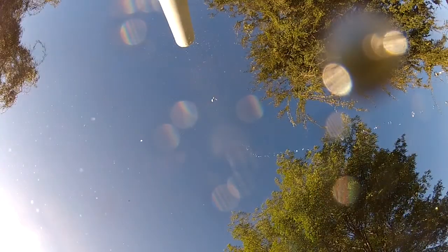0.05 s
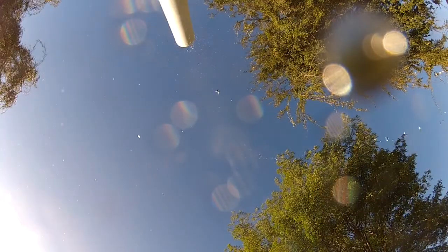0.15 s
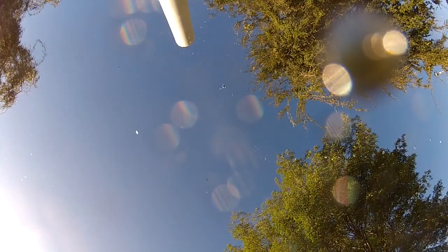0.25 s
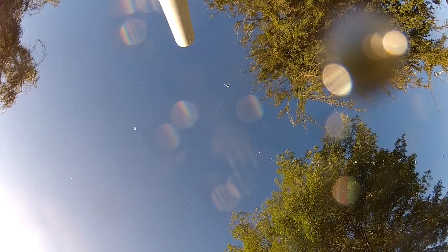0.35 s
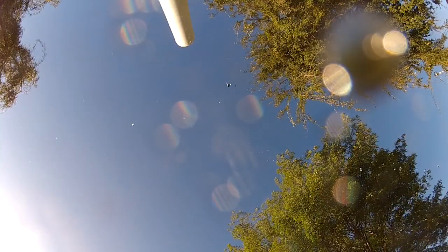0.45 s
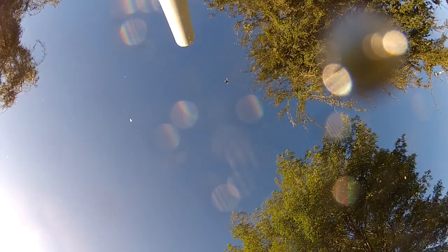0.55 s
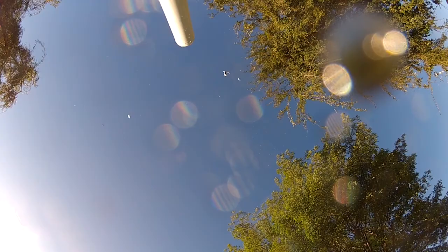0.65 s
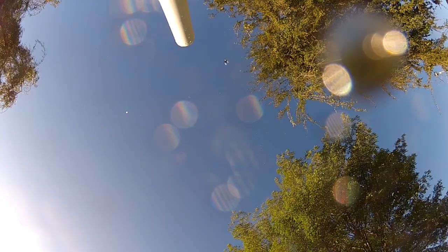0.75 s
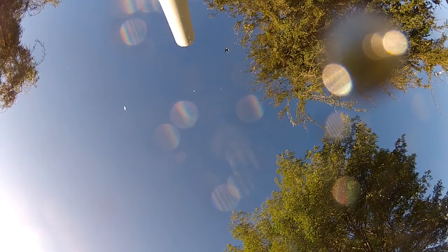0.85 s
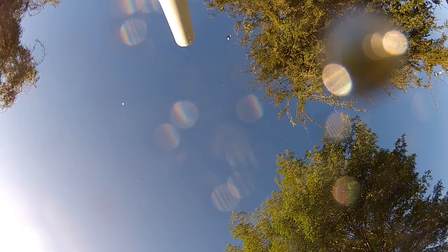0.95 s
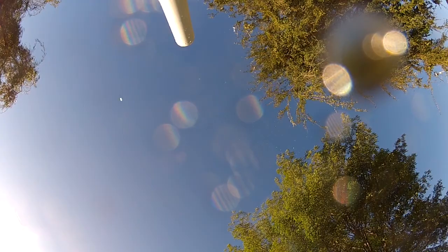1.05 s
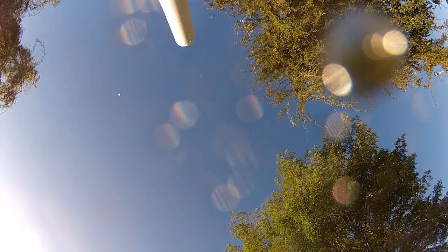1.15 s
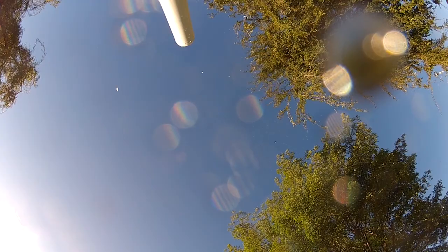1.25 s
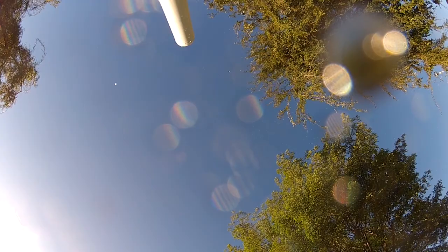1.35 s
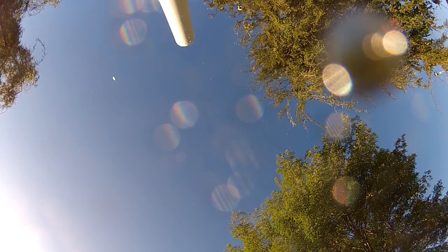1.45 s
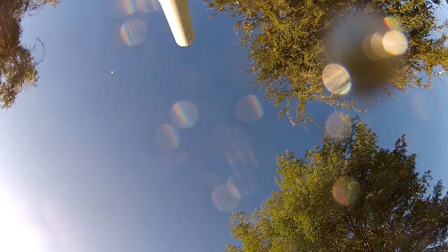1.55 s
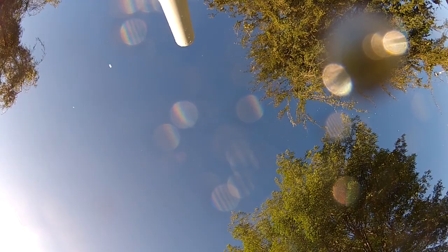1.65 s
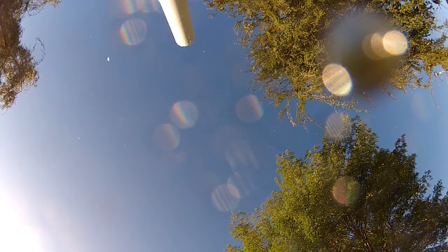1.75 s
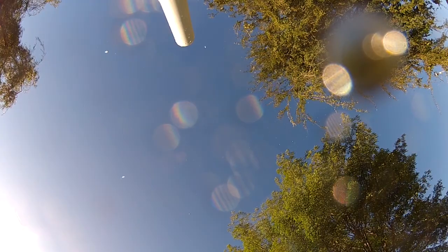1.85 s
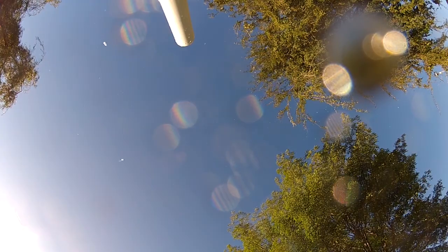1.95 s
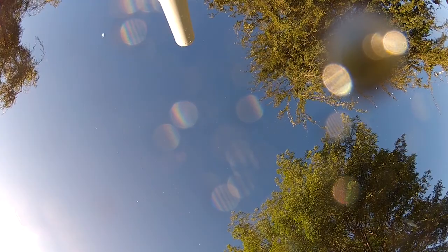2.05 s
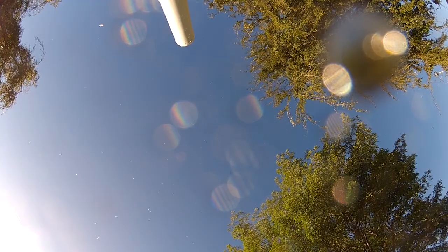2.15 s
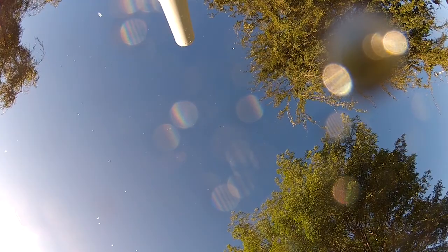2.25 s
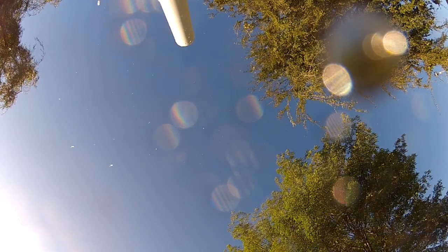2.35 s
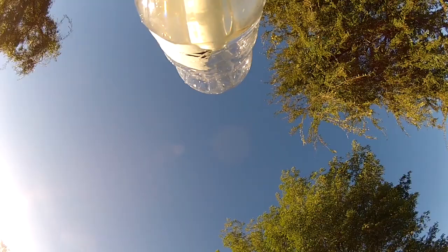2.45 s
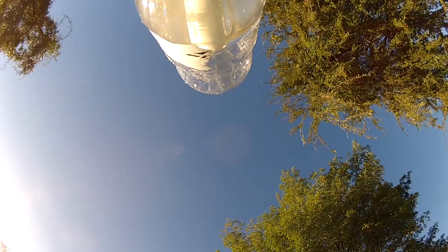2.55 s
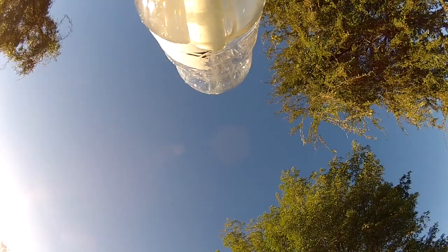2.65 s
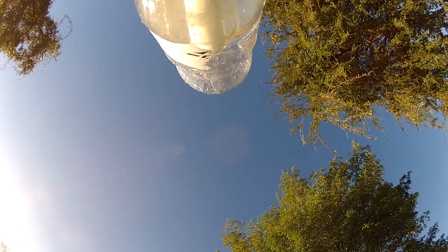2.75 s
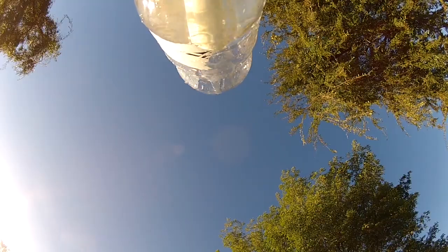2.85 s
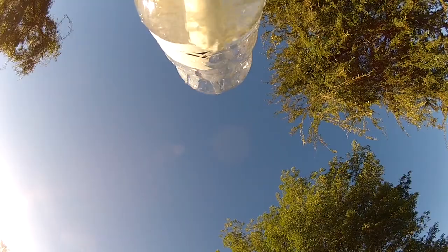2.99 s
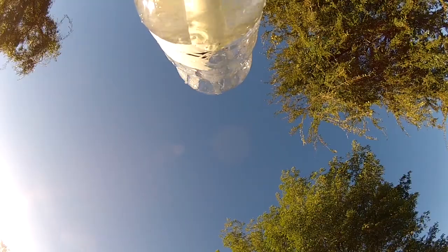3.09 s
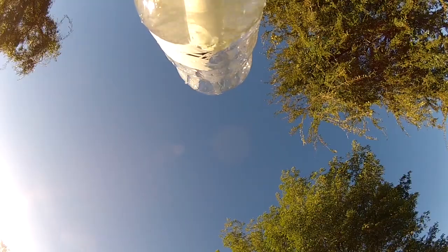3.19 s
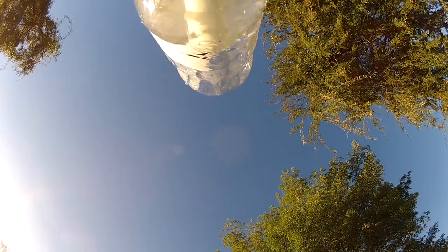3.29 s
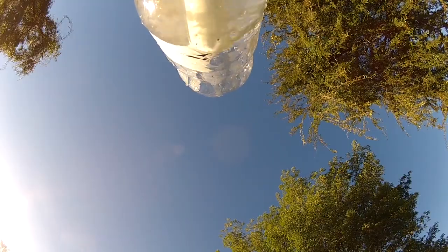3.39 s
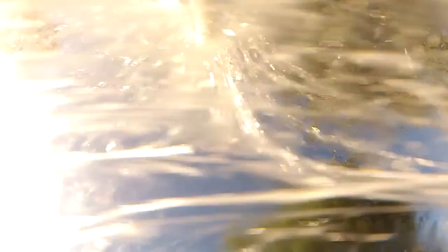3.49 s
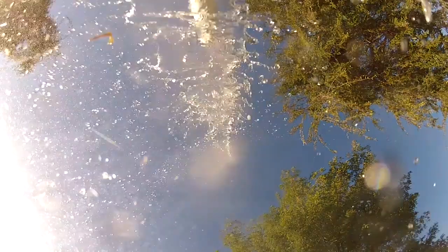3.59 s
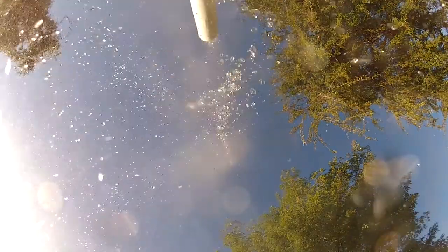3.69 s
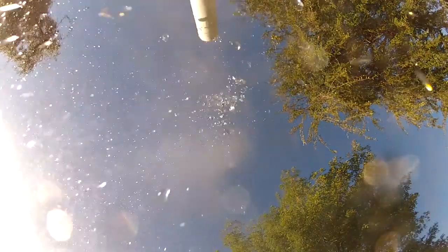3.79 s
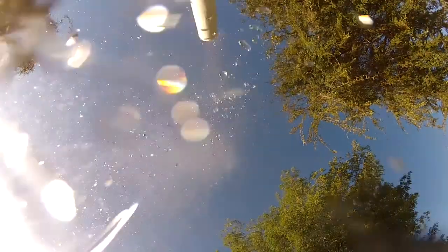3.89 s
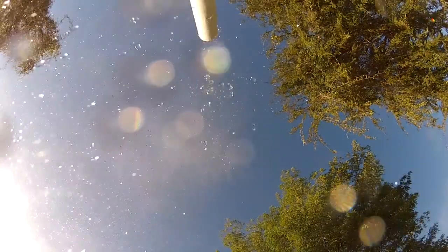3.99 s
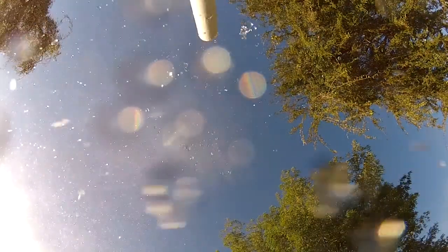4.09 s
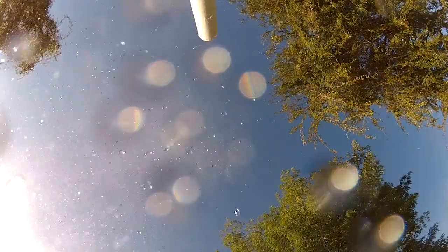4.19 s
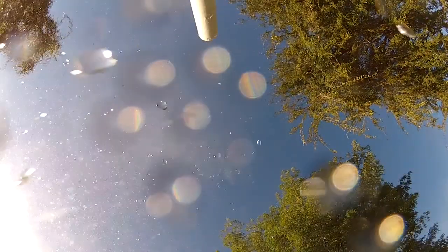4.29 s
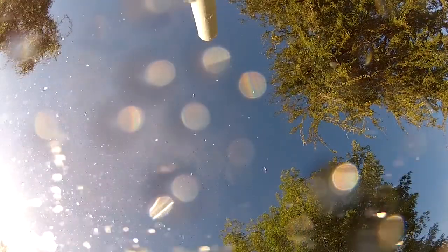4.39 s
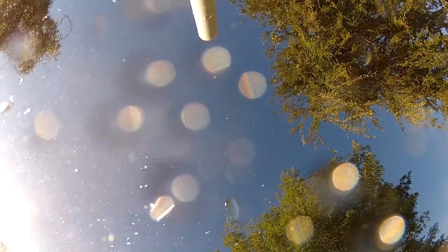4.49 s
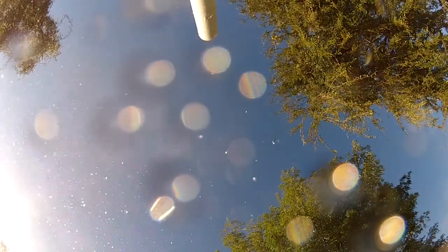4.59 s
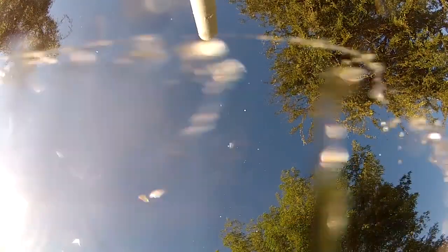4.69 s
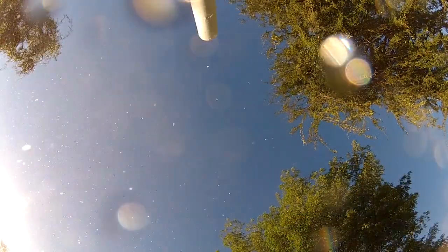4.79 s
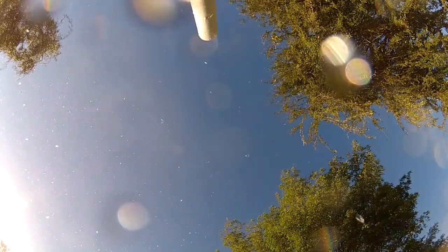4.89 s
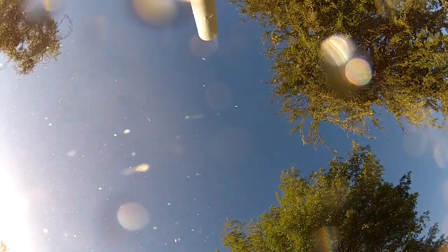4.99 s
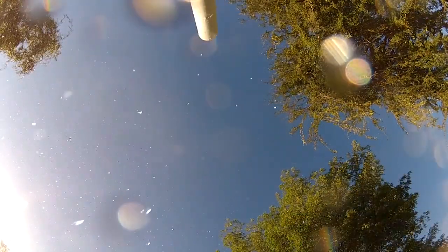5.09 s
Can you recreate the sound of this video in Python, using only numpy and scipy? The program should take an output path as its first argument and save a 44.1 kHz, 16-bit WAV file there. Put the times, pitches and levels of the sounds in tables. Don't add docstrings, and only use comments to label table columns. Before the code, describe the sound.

Dense bright spray rattles on a plastic camera housing, stops within half a second, and leaves sparse tiny drips in quiet open air. A faint wavering hiss and whistle comes from a bottle neck, then a loud crackling jet of water slaps the housing. Spray showers back and fat drops smack the plastic with short hard knocks. Close microphone inside the housing, gritty slowed playback.

```python
import sys
import numpy as np
from scipy import signal
from scipy.fft import rfft, irfft
from scipy.io import wavfile
from scipy.ndimage import uniform_filter1d

SR = 44100
rng = np.random.default_rng(int(sys.argv[2]) if len(sys.argv) > 2 else 0)


def generate_wav(sig):
    pcm = np.round(np.clip(np.atleast_2d(sig).T, -1, 1) * 32767).astype(np.int16)
    wavfile.write(sys.argv[1], SR, pcm)


def gain_from_db(level_db):
    decades = np.asarray(level_db, float) / 20
    return 10 ** decades


N = 226409

# time_s, level_db
SPRAY_VIGOUR = [
    [(0.0, -24), (0.114, -23), (0.2, -23.5), (0.284, -23.5), (0.352, -25), (0.39, -30), (0.45, -36),
     (0.52, -39), (0.558, -47), (0.66, -77)],
    [(3.585, -58), (3.643, -45.5), (3.687, -37), (3.791, -25.5), (3.893, -27.5), (3.951, -25.5),
     (4.103, -28.5), (4.151, -33.5), (4.335, -57)],
]
# pitch_hz, width_hz, level_db
SPRAY_BRIGHT_EARLY = [(3770, 190, -3), (4430, 300, -5.5), (5020, 220, -8.5), (5400, 200, -20),
                      (5900, 900, -25)]
SPRAY_BRIGHT_LATE = [(3820, 220, -5), (4426, 130, 0.5), (4940, 200, -8), (5350, 260, -10),
                     (4500, 2100, -13.5), (5900, 800, -22)]
# pitch_hz, width_hz, level_db
SPRAY_CENTRE_EARLY = [(736, 240, -26.5), (1100, 700, -2), (1400, 200, -6), (1710, 150, -10),
                      (2020, 150, -1), (2300, 200, 4), (2530, 200, 3)]
SPRAY_CENTRE_LATE = [(980, 325, -2), (1364, 95, -5), (1920, 970, -7), (2580, 110, 2.5)]
# level_db at full spray, share of the vigour followed, sag_db_per_s
SPRAY_MIDDLE_PART = [(-31, 0.74, 9.5), (-31, 0.9, 2)]
SPRAY_LOW_PART = [(-43, .4, 30), (-36, 1.2, 1.4)]
# pitch_hz at first, climb_share, width_hz, level_db,
# others_db (level of the other modes)
TUBE_MODE = [(3070, .06, 320, -5, -3), (3036, 0.044, 326, -4.5, -4.5)]
# pitch_hz, level_db
AIR_COLOUR = [(35, -47.5), (60, -1.5), (134, 2.5), (250, -1.5), (410, -2), (560, -10), (4960, -22),
              (5900, -31), (7670, -75.5)]
# start_s, rumble_db, drain_db_per_s
PORT_SOAKINGS = [
    (2.58, -57, 31.5),
    (3.62, -45, 22),
    (4.36, -38, 26),
]
# start_s, peak_db, pitch_hz, tick_db
NEAR_DRIPS = [(0.6642, -47, 3500, -77), (0.6853, -39.5, 2100, -77), (0.712, -60, 2400, -57),
              (0.7301, -52, 860, -63), (0.812, -53, 2420, -57), (0.9626, -47, 3080, -51.5),
              (1.0075, -48, 2270, -52), (1.0475, -33.5, 2470, -60), (1.1754, -60, 2350, -54),
              (1.3548, -40.5, 2500, -45.5), (1.3806, -48, 940, -58), (1.415, -47, 2220, -53),
              (1.5916, -45.5, 3120, -57.5), (1.632, -49.5, 3430, -59.5), (1.7162, -49, 1270, -63),
              (1.7588, -44.5, 3500, -74.5), (1.7866, -51, 960, -79), (1.8975, -60, 1960, -59),
              (2.0187, -42.5, 2420, -51), (2.0466, -49, 1080, -56), (2.068, -46, 2190, -60),
              (2.1015, -50, 1450, -75), (2.154, -48, 900, -84), (2.1788, -45, 1146, -70.5),
              (2.3392, -53, 2640, -65), (2.3669, -45, 1040, -60), (2.4077, -50, 3500, -62),
              (2.4228, -32.5, 934, -58), (2.4542, -50.5, 1060, -78), (2.4921, -56, 2240, -77)]
# start_s, peak_db, pitch_hz, tick_db
SECOND_DRIPS = [(4.515, -46, 2300, -58), (4.634, -39, 3500, -52), (4.657, -48, 953, -59),
                (4.688, -42, 3450, -62), (4.703, -52, 3600, -57), (4.769, -48, 2150, -58),
                (4.78, -48, 1017, -68), (4.798, -51, 2160, -60), (4.815, -44.5, 920, -53.5),
                (4.83, -44, 1000, -60.5), (4.889, -56, 3100, -66), (4.911, -52, 3400, -71),
                (4.934, -52, 1000, -54.5), (4.977, -55, 3300, -62), (5.07, -46, 1000, -72),
                (4.966, -44, 960, -70), (4.431, -50, 2200, -58), (5.016, -46, 1900, -58),
                (4.8185, -52, 2600, -62), (4.556, -39.5, 2540, -69), (4.9665, -37, 2330, -64),
                (5.091, -38.5, 910, -74), (5.115, -46, 966, -58)]
# start_s, peak_db, pitch_hz,
# tick_db
FURTHER_DRIPS = [(.666, -54, 1030, -80), (.69, -47, 1055, -82), (.7925, -61, 2240, -68),
                 (.8454, -67, 1890, -71), (.858, -67, 1900, -75), (.8828, -63, 2300, -64),
                 (.9107, -60, 2190, -67), (.9302, -58, 2100, -74), (.938, -57, 1950, -70),
                 (1.0804, -66, 3300, -64), (1.1492, -58, 2150, -78), (1.16, -62, 3400, -72),
                 (1.183, -60, 2260, -81), (1.2969, -55, 3450, -71), (1.3263, -64, 2270, -70),
                 (1.343, -54, 2300, -65), (1.343, -51, 960, -80), (1.384, -55, 1900, -80),
                 (1.43, -54, 2200, -62), (1.066, -66, 2300, -68), (1.366, -62, 2300, -68),
                 (1.502, -66, 2200, -68), (1.833, -66, 2000, -70), (1.918, -64, 2200, -67),
                 (1.936, -66, 3300, -70), (1.5353, -54.5, 2300, -65), (1.576, -58, 1610, -75),
                 (1.606, -62, 3200, -66), (1.718, -56.5, 2030, -81), (1.9848, -63.5, 2190, -77),
                 (2.074, -45.5, 220, -85), (2.133, -57, 3570, -74), (2.156, -51, 2150, -70),
                 (2.179, -45.5, 2150, -79.5), (2.26, -64, 3380, -80), (2.354, -58, 2800, -68),
                 (2.368, -47, 2170, -82), (2.468, -53, 2140, -72), (2.47, -52, 1050, -72),
                 (4.779, -51.5, 3700, -64), (4.8525, -46, 2420, -68), (5.085, -58.5, 3500, -79),
                 (5.098, -44, 3570, -67), (5.122, -40, 420, -75)]
# start_s, peak_db, pitch_hz
WATER_POCKETS = [(2.573, -50, 880), (2.572, -46, 2000), (2.572, -52, 3600), (2.572, -52, 4450),
                 (4.995, -40, 3200), (4.995, -40, 400), (3.531, -13, 2200), (3.536, -16, 3050),
                 (2.4244, -34.5, 1750), (2.4242, -38, 610), (2.4243, -42, 233), (2.4239, -41.5, 1270),
                 (3.5005, -20.5, 1000), (3.509, -14.5, 3390), (3.531, -18, 3500), (3.538, -13.5, 3430),
                 (3.571, -22, 966), (3.571, -21, 2200), (3.575, -26, 3300), (4.7496, -23, 5290),
                 (5.0285, -16.5, 5220), (5.0298, -24.5, 4550), (4.578, -22.5, 3050), (4.61, -26, 2100),
                 (2.7087, -28.5, 1640), (2.7073, -22, 3150), (3.915, -22, 3130), (3.9252, -8, 2960),
                 (3.948, -15, 1470), (3.949, -11, 3010), (3.948, -13, 3320), (4.058, -21, 1464),
                 (4.059, -20.5, 635), (4.057, -17, 3200), (4.091, -22, 1290), (4.265, -30, 1900),
                 (4.339, -21, 1750), (4.473, -10, 3590), (4.473, -12, 1605), (4.602, -9.5, 1570),
                 (4.731, -23, 2120), (4.9942, -34, 1500), (5.003, -37, 2870), (5.0307, -10, 1730)]
# pitch_hz, level_db, t60_s (time to fade by 60 dB)
HOUSING_MODES = [
    [(170, 0, .02), (280, -9, .02), (420, -3, .02), (625, -12, .02)],
    [(1000, 0, .019), (1350, -14, .008)],
    [(1650, -13, .007), (1900, -11, .006), (2215, 0, .009)],
    [(3200, -9, .005), (3650, 0, .007), (4350, -7, .004), (5250, -13, .003)],
]
HOUSING_ANSWER = [-8.5, 1.16, 2.3, 0.9]
SPATTER_UNDER = [-8, -5, -27, -23]
# start_s, peak_db, spread_ms, tilt_db per group, ring_db (extra 1 kHz ring)
DROP_SMACKS = [(2.4258, -47, 3, -5, 4), (2.706, -36, 0.86, 8, 12), (3.915, -10.5, 0.94, -3, -1.5),
               (3.9241, -19.5, 0.55, 10, 6), (3.9467, -19, 0.5, 9, 0), (3.948, -15, 0.47, 0, -3),
               (3.9744, -25.5, 0.81, -5, -15), (4.0599, -17, 1.75, -5, -8.5),
               (4.0914, -25.5, 0.3, -5, -2.5), (4.147, -22, 0.26, -1, 1), (4.265, -36, 0.88, -7, 4.5),
               (4.3284, -43, 1.2, -10, -1), (4.3381, -15, 0.51, -0.8, -1.5), (4.407, -3.5, 1.27, 1, -0.5),
               (4.4416, -10.5, 0.3, -1.5, 3), (4.4631, -13, 1.3, -4, -1.5), (4.473, -2.5, 0.14, -2, -1.5),
               (4.4985, -27.5, 0.17, -3.5, -4), (4.5767, -24.5, 1.5, -3, -16),
               (4.602, -10.5, 0.3, -1, -0.5), (4.6509, -36, 0.55, -3.5, -2), (4.72, -26.5, 0.45, 4.5, -10),
               (4.7255, -20, 1.1, -1, 3), (4.7429, -29, 0.57, 3, -1), (4.7503, 2, 1.3, 2, -6.5),
               (4.8653, -46, 0.88, -1, -1), (4.995, -40, 1.1, -9, -3), (5.0028, -38, 2.1, -6, 6),
               (5.0142, -39, 1.2, -11, 7), (5.0294, -6.5, 2.5, -2, 4)]
# time_s, level_db
LEAK_FLOW = [(2.568, -61), (2.61, -64), (2.65, -53), (2.694, -43), (2.76, -44), (2.82, -49), (3.03, -52),
             (3.14, -63), (3.34, -65), (3.468, -67)]
# pitch_hz, width_hz, level_db
NECK_RESONANCES = [(2100, 780, 0.5), (3200, 200, 17), (3660, 300, 1.5), (4600, 500, 9), (5150, 500, 3),
                   (5850, 900, -1)]
# final pitch_hz, flat_share at the start, wander_share, width_hz, level_db
BOTTLE_WHISTLES = [(1047, 0.1, .0015, 16.6, 3), (2182, 0.04, 0.0026, 19.7, 3),
                   (3120, 0.02, 0.0019, 40, 0.5), (4550, 0.015, 0.0023, 30, 1.5),
                   (4480, 0.01, 0.006, 70, -4), (4660, 0.015, 0.008, 80, -4), (5080, 0.02, 0.008, 60, -9),
                   (5320, 0.01, 0.003, 45, -13)]
# time_s, level_db
FIRST_WHISTLE = [(2.575, -72), (2.6, -59), (2.63, -68), (2.73, -63), (2.8, -63), (2.91, -62), (2.96, -70),
                 (3.01, -73), (3.05, -82)]
# time_s, level_db
SECOND_WHISTLE = [(2.572, -54), (2.62, -65), (2.7, -58), (2.765, -50), (2.85, -60), (2.9, -77),
                  (2.985, -61.5), (3.03, -75), (3.24, -72), (3.3, -85)]
# start_s, length_s, level_db, crackle_db
JET_SLAPS = [(2.572, 0.005, -62, 2), (3.468, 0.046, -37.5, -2.5), (3.495, 0.0014, -33, 22.5),
             (3.5, 0.014, -23, -3.2), (3.5085, 0.005, -12.5, -2), (3.517, 0.021, -44.5, 8.5),
             (3.5296, 0.0089, -13, 3), (3.537, 0.0022, -30, 11), (3.537, 0.013, -42.5, 6),
             (3.557, 0.018, -37.5, 4), (3.567, 0.013, -32, -2.1), (3.577, .029, -55.5, -5)]
# start_s, length_s, level_db, crackle_db above that level
WATER_SHEETS = [(4.336, 0.054, -38, -7.5), (4.358, 0.012, -40, -8), (4.366, 0.018, -34, -10),
                (4.371, 0.014, -26, -10.5), (4.385, 0.0085, -36, -10), (4.395, 0.0069, -41.5, 0.5),
                (4.409, 0.026, -40.5, -6.5), (4.447, 0.0096, -29, -15), (4.463, 0.014, -21, -5),
                (4.498, 0.0155, -35.5, -19), (4.576, 0.018, -24.5, -13), (4.595, 0.0038, -43.5, -2),
                (4.602, 0.019, -17, -8), (4.718, 0.028, -28, -5.5), (4.73, 0.0086, -48, -14.5),
                (5.028, 0.012, -33.5, -3)]
# start_s, peak_db, pitch_hz, t60_s
HOUSING_SHOVES = [(2.587, -49, 106, 0.081), (3.473, -23.5, 177.5, 0.087), (3.509, -5, 250, 0.009),
                  (3.537, -9, 309, 0.0024), (3.542, -30, 120, 0.051), (3.872, -27.5, 126, 0.04),
                  (5.015, -38, 200, 0.03), (4.38, -24.5, 198.5, 0.028), (4.384, -20, 141.7, 0.025),
                  (4.581, -21.5, 139, 0.14), (4.725, -25, 175, 0.016), (3.51, -8, 173, 0.0134),
                  (3.531, -13.5, 222, 0.012), (3.5092, -2, 1010, 0.008), (4.474, -19, 380, 0.03),
                  (3.535, -25, 29.7, 0.1), (4.263, -32.5, 404, 0.054), (4.472, -15, 627, 0.045),
                  (4.606, -19, 632, 0.035), (4.866, -42, 625, 0.05)]


def rms_one(x):
    return x / np.sqrt(np.mean(x ** 2) + 1e-20)


def since(s):
    return np.maximum(np.arange(N) / SR - s, 0)


def in_time(rows):
    s, db = np.transpose(rows)
    return np.interp(np.arange(N) / SR, s, db, left=-300, right=-300)


def band(x, low_hz, high_hz):
    return signal.sosfilt(signal.butter(2, [low_hz, high_hz], "band", fs=SR, output="sos"), x)


def drift(rate_hz):
    sos = signal.butter(2, [rate_hz / 8, rate_hz], "band", fs=SR / 16, output="sos")
    slow = signal.sosfilt(sos, rng.standard_normal(N // 16 + 2))
    return np.interp(np.arange(N) / 16, np.arange(len(slow)), rms_one(slow))


def grains(per_s, spread_db):
    sizes = gain_from_db(spread_db * np.minimum(rng.exponential(1, N), 4)) * rng.choice([-1, 1], N)
    return rms_one(sizes * (rng.random(N) < per_s / SR))


def resonate(x, peaks, flicker_db, count=1):
    out = 0
    for k, (hz, width, db) in enumerate(peaks):
        r = np.exp(-np.pi * width / SR)
        rise = [1 - r * r, 0, r * r - 1]
        fall = [2, -4 * r * np.cos(2 * np.pi * hz / SR), 2 * r * r]
        top = x
        for _ in range(count):
            top = signal.lfilter(rise, fall, top)
        out = out + (-1) ** k * gain_from_db(db + flicker_db * drift(31)) * top
    return rms_one(out)


def evened(x):
    return rms_one(x / (uniform_filter1d(x ** 2, size=250) + 1e-9) ** .35)


def ring(modes, spread_s, rough, length_s):
    t = np.arange(round(length_s * SR)) / SR
    contact = np.exp(-(t / spread_s) ** 2)
    swell = np.sin(np.pi / 2 * np.minimum(t / (0.27 * spread_s), 1)) ** 2
    uneven = 1 + rough * contact * uniform_filter1d(rng.standard_normal(len(t)), size=8)
    out = 0
    for (hz, db, t60), (turn, chance) in zip(modes, rng.random((len(modes), 2))):
        decay_db = -60 * np.maximum(t - spread_s, 0) / t60
        out = out + gain_from_db(db + 4 * chance + decay_db) * np.sin(2 * np.pi * (hz * t + turn))
    out = out * swell * uneven
    return out / np.max(np.abs(out))


def add(out, s, sound):
    i = round(s * SR)
    out[i:i + len(sound)] += sound[:N - i]


def climbing(x, rows, share):
    start, end = rows[0][0], rows[-1][0]
    progress = np.minimum(since(start) / (end - start), 1) * (since(end) == 0)
    return np.interp(np.cumsum(1 + share * progress), np.arange(N), x)


def spray():
    full_spray_db = -25
    tube_swell_db_per_s = 9
    out = np.zeros(N)
    showers = [(SPRAY_BRIGHT_EARLY, SPRAY_CENTRE_EARLY), (SPRAY_BRIGHT_LATE, SPRAY_CENTRE_LATE)]
    for k, (bright, centre) in enumerate(showers):
        curve = SPRAY_VIGOUR[k]
        age, vigour_db = since(curve[0][0]), in_time(curve)
        part_gains = []
        for db, share, sag in (SPRAY_MIDDLE_PART[k], SPRAY_LOW_PART[k]):
            followed_db = np.clip(share, .3, 1.5) * (vigour_db - full_spray_db)
            part_gains.append(gain_from_db(db + followed_db - sag * age))
        middle_gain, low_gain = part_gains
        rain = (grains(2500, 1.5) + 0.7 * rng.standard_normal(N)) * gain_from_db(0.6 * drift(120))
        hz, climb, width, db, others_db = TUBE_MODE[k]
        tube = climbing(resonate(rain, [(hz, width, 0)], flicker_db=.7, count=2), curve, climb)
        tube_gain = gain_from_db(db + tube_swell_db_per_s * np.minimum(age, 1))
        others = gain_from_db(others_db) * resonate(rain, bright, flicker_db=.7, count=2)
        out += gain_from_db(vigour_db) * (tube_gain * tube + others)
        out += middle_gain * resonate(rain, centre, flicker_db=.7, count=2)
        out += low_gain * gain_from_db(-9.0) * rms_one(band(rain, 120, 540))
    return out


def outdoors():
    air_db, wind_db, soak_attack_s = -62, -70, 0.066
    hz = np.maximum(np.arange(N // 2 + 1) * SR / N, 1)
    colour_hz, colour_db = np.transpose(AIR_COLOUR)
    colour = gain_from_db(np.interp(np.log(hz), np.log(colour_hz), colour_db))
    coloured = irfft(rfft(rng.standard_normal(N)) * colour, N)
    air = rms_one(coloured) * gain_from_db(air_db + 1.5 + 0.8 * drift(4.3))
    soaked = np.zeros(N)
    for s, db, drain in PORT_SOAKINGS:
        soaked += np.minimum(since(s) / soak_attack_s, 1) * gain_from_db(db - drain * since(s))
    rumble = rms_one(band(rng.standard_normal(N), 12, 82)) * gain_from_db(wind_db + 2.5 * drift(2.8))
    rumble += rms_one(band(band(rng.standard_normal(N), 22, 44), 20, 48)) * soaked
    return air + rumble


def drips():
    out = np.zeros(N)
    for s, peak_db, hz, tick_db in list(NEAR_DRIPS) + list(SECOND_DRIPS) + list(FURTHER_DRIPS):
        blip = [(hz, 0, 16 / hz), (1012, -24, .012), (2230, -12, .007)]
        tick = [(2330, 2, 0.0035), (3300, 4.5, 0.0048), (4480, -1, 0.006), (5190, -2.5, 0.0028)]
        add(out, s, gain_from_db(peak_db - 1) * ring(blip, 0.002, rough=0.66, length_s=0.034))
        add(out, s, gain_from_db(tick_db + 13.0) * ring(tick, 0.0006, rough=2.5, length_s=.01))
    return out


def pockets():
    out = np.zeros(N)
    for s, peak_db, hz in WATER_POCKETS:
        add(out, s, gain_from_db(peak_db) * ring([(hz, 0, 16 / hz)], 0.0018, rough=0.98, length_s=.04))
    return out


def smacks():
    push_db, push_s = -8.5, 0.0011
    out, t = np.zeros(N), np.arange(3000) / SR
    for s, peak_db, spread_ms, tilt_db, ring_db in DROP_SMACKS:
        group_db = peak_db + np.array(HOUSING_ANSWER) + tilt_db * np.linspace(-3 / 2, 3 / 2, 4)
        group_db = group_db + ring_db * np.array([0, 1, 0, 0])
        add(out, s, gain_from_db(group_db[0] + push_db) * t / push_s * np.exp(1 - t / push_s))
        specks = (rng.random(len(t)) < .04) * 3
        spatter = rng.standard_normal(len(t)) * (0.38 + specks) * np.minimum(t / 0.0018, 1)
        spread_s = 0.0011 * np.clip(spread_ms, .2, 3)
        for modes, db, under_db in zip(HOUSING_MODES, group_db, SPATTER_UNDER):
            detuned = np.array(modes) * (1 + rng.normal(0, 1, (len(modes), 1)) * [.012, 0, 0])
            add(out, s, gain_from_db(db) * ring(detuned, spread_s, rough=1.6, length_s=.07))
            tail = rms_one(band(spatter, 0.59 * modes[0][0], 0.65 * modes[-1][0]))
            add(out, s, gain_from_db(db + under_db - 4600 * t) * tail)
    return out


def leak():
    start_s, settle_s, upper_swell_s = 2.57, 0.3, 0.15
    upper_db, calm_flow_db, break_up = -63, -42, 2.5
    clear_s, clear_swell_s = 3.2, .1
    steady_hz = 55
    flow_db, age = in_time(LEAK_FLOW), since(start_s)
    hiss = gain_from_db(flow_db)
    is_open = (flow_db > -100) * np.minimum(age / 0.05, 1)
    first = gain_from_db(in_time(FIRST_WHISTLE) + 0.8 * drift(9.7))
    second = gain_from_db(in_time(SECOND_WHISTLE) + 1.8 * drift(38))
    broken_db = break_up * np.maximum(flow_db - calm_flow_db, 0)
    swell = np.minimum(age / upper_swell_s, 1) ** 2
    upper = is_open * swell * gain_from_db(upper_db - broken_db + 0.8 * drift(1.05))
    clear = upper * (0.3 + 0.7 * np.minimum(since(clear_s) / clear_swell_s, 1))
    breathy = [hiss * gain_from_db(3 * drift(18)) for _ in range(4)]
    flat = np.exp(-age / settle_s)
    flutter = 0.045 * flat ** 3 * drift(150)
    out = hiss * gain_from_db(-3.5) * resonate(rng.standard_normal(N), NECK_RESONANCES, flicker_db=.8, count=2)
    gains = [first, second, upper, clear] + breathy
    for (hz, share, wander, width, db), gain in zip(BOTTLE_WHISTLES, gains):
        pitch_hz = hz * (1 - share * flat + wander * drift(16) + flutter)
        phase = 2 * np.pi * np.cumsum(pitch_hz) / SR
        steady = steady_hz / width * (1 - 0.87 * flat)
        whistle = (steady + drift(width)) * np.sin(phase) + drift(width) * np.cos(phase)
        out += gain * gain_from_db(db) * rms_one(whistle)
    return out


def splashes():
    jet_low_db, jet_fade_db, sheet_low_db, sheet_fade_db = -6, 2, -10, 22
    trickle_s, trickle_low_db, trickle_db, trickle_sag_db_per_s = 3.6, -59, -55, 4
    middle_peaks = [(620, 480, -3), (911, 300, 4.5), (1580, 1300, -4.0)]
    bright_peaks = [(2150, 930, -3), (3470, 1000, 2.5), (4400, 900, -5), (5300, 1800, -13)]
    patter_peaks = [(1000, 210, -0.5), (2160, 920, -5), (3500, 610, -9.5)]
    water = grains(3000, 3) + .6 * rng.standard_normal(N)
    low = evened(band(band(water, 70, 450), 55, 590))
    middle = evened(resonate(water, middle_peaks, flicker_db=-2.0, count=2))
    bright = evened(resonate(water, bright_peaks, flicker_db=-2.0, count=2))
    low_gain, middle_gain, bright_gain = np.zeros((3, N))
    rows = [(*row, jet_low_db, jet_fade_db) for row in JET_SLAPS]
    rows += [(*row, sheet_low_db, sheet_fade_db) for row in WATER_SHEETS]
    for s, length, middle_db, crackle_db, under_db, fade_db in rows:
        t = np.arange(round((length + .03) * SR)) / SR
        shape = np.minimum(t / .0012, 1) * np.exp(-np.maximum(t - length, 0) / .0018)
        add(low_gain, s, gain_from_db(middle_db + under_db) * shape)
        add(middle_gain, s, gain_from_db(middle_db - 0.76 * fade_db * t / length) * shape)
        add(bright_gain, s, gain_from_db(middle_db + crackle_db - fade_db * t / length) * shape)
    wet = np.minimum(since(trickle_s) / 0.07, 1)
    film_low = wet * gain_from_db(trickle_low_db)
    film_upper = wet * gain_from_db(trickle_db - trickle_sag_db_per_s * since(trickle_s))
    patter = resonate(grains(390, 5.3) + 2.8 * water, patter_peaks, flicker_db=4.0)
    bursts = (low_gain + film_low) * low + middle_gain * middle + bright_gain * bright
    return bursts + film_upper * patter


def shoves():
    out = np.zeros(N)
    for s, peak_db, hz, t60 in HOUSING_SHOVES:
        add(out, s, gain_from_db(peak_db) * ring([(hz, 0, t60)], 0.0042, rough=0.067, length_s=.12))
    return out


def scene():
    mid = spray() + outdoors() + drips() + pockets() + smacks() + leak() + splashes() + shoves()
    late = np.roll(mid, 40)
    side = gain_from_db(-24) * signal.lfilter([.01], [1, -.99], mid)
    side += gain_from_db(-45) * band(late, 300, 1500) * drift(300)
    side += gain_from_db(-45) * late * drift(300)
    return np.array([mid + side, mid - side])


def band_limit(x):
    return signal.sosfilt(signal.butter(12, 16500, fs=SR, output="sos"), x)


def record(dry):
    held_hz, full_hz = 12000, 48000
    dry = signal.sosfilt(signal.butter(1, 16, "high", fs=SR, output="sos"), dry)
    hard = dry / (1 + np.abs(dry) ** 8) ** (1 / 8)
    slow = signal.resample_poly(hard, 40, 147, axis=1)
    held = np.repeat(slow, full_hz // held_hz, axis=1)
    back = signal.resample_poly(held, 147, 160, axis=1)[:, :N]
    cut = signal.sosfilt(signal.ellip(8, .5, 32, 15330, fs=SR, output="sos"), back)
    full = signal.sosfilt(signal.ellip(8, .2, 50, 16450, fs=SR, output="sos"), np.clip(cut, -1, 1))
    return band_limit(0.99 * full)


dry = scene()
out = record(dry)
generate_wav(out)
```